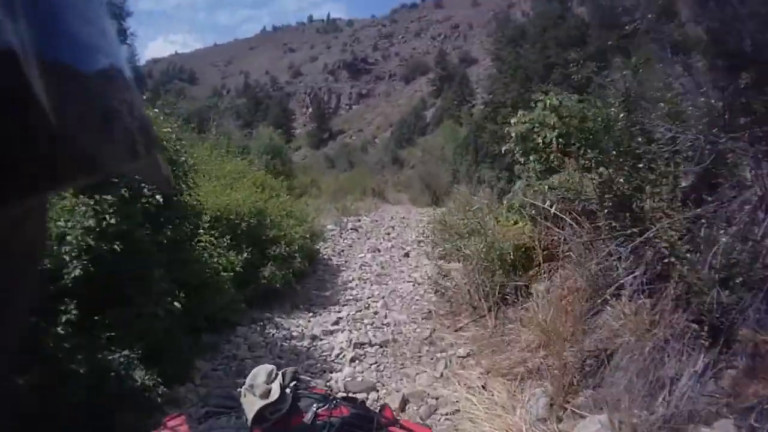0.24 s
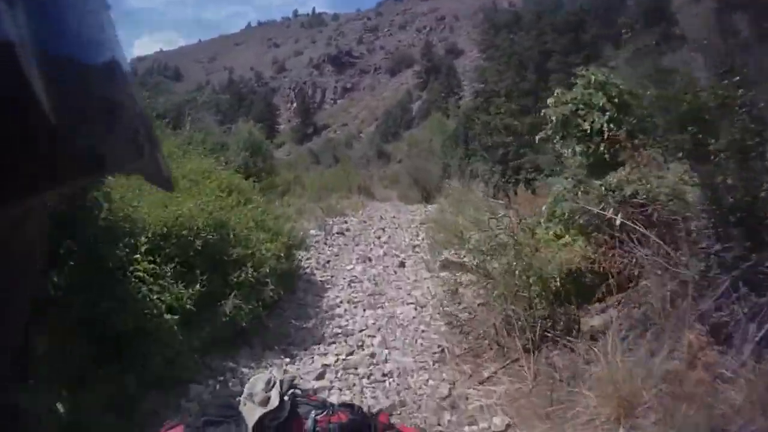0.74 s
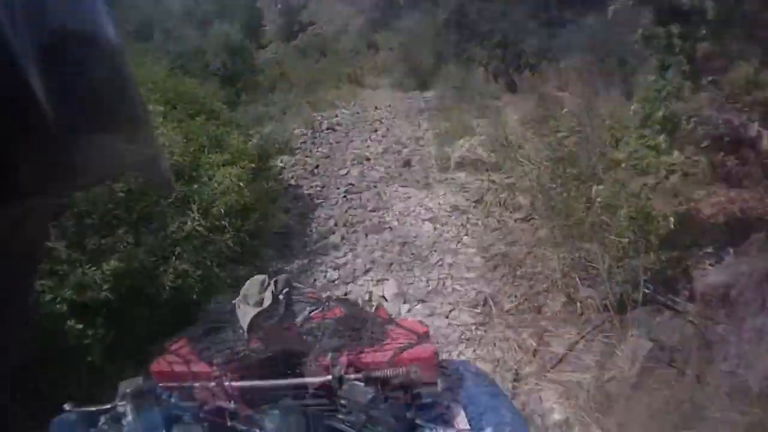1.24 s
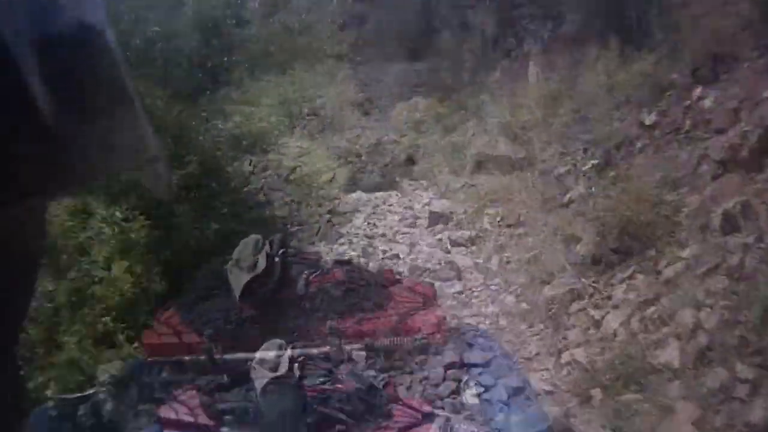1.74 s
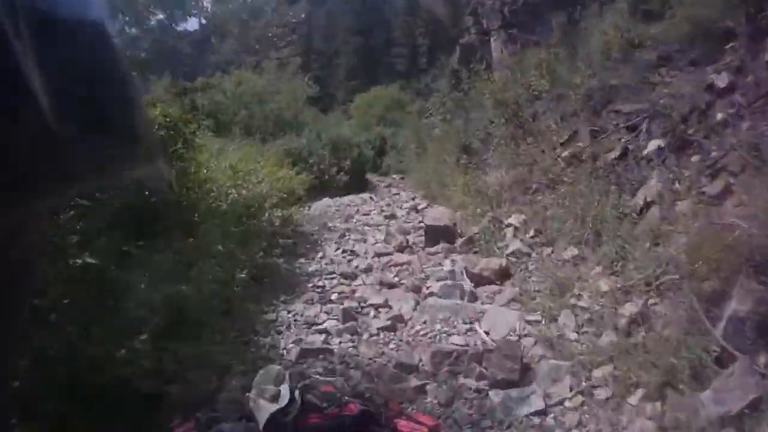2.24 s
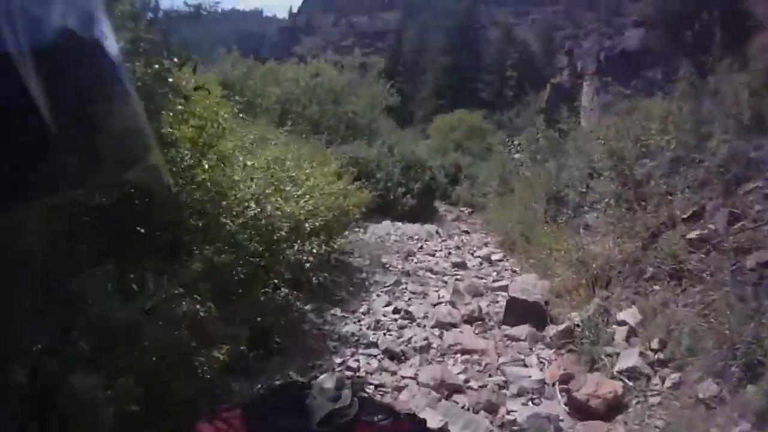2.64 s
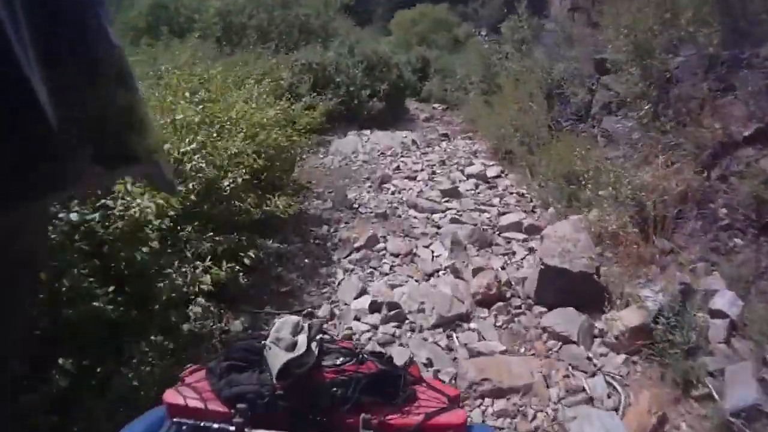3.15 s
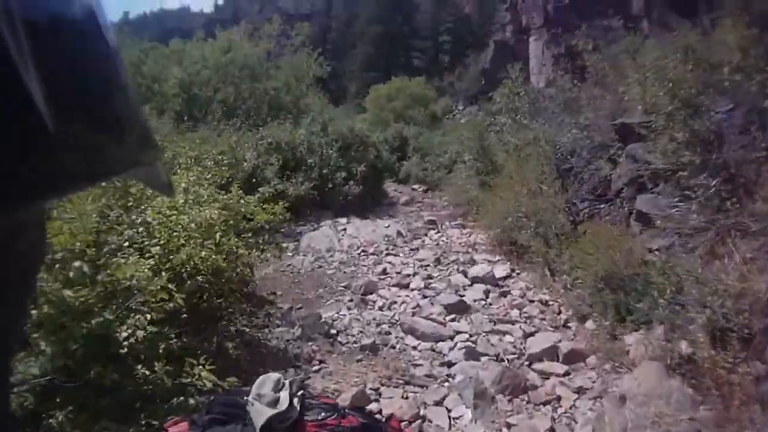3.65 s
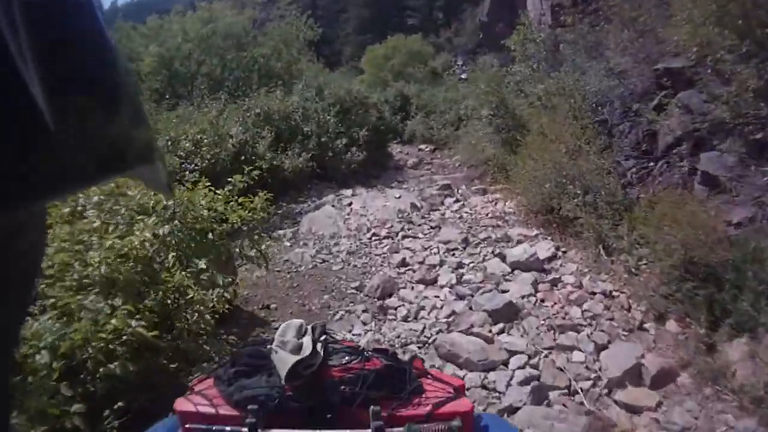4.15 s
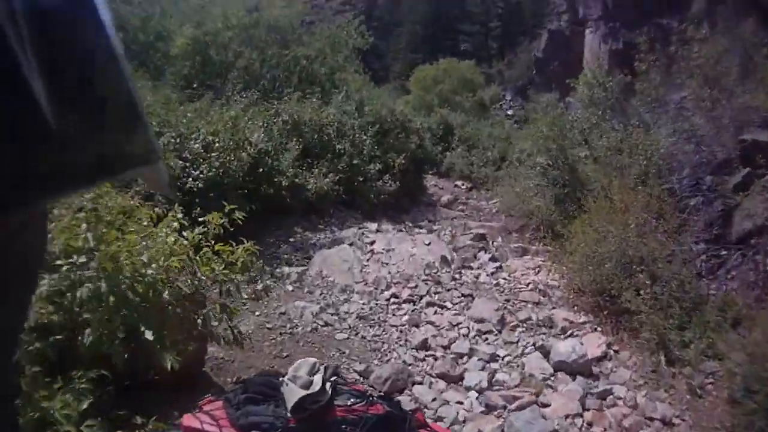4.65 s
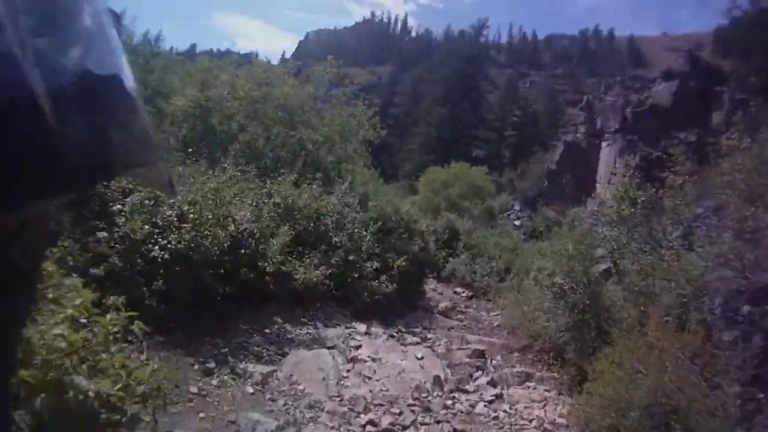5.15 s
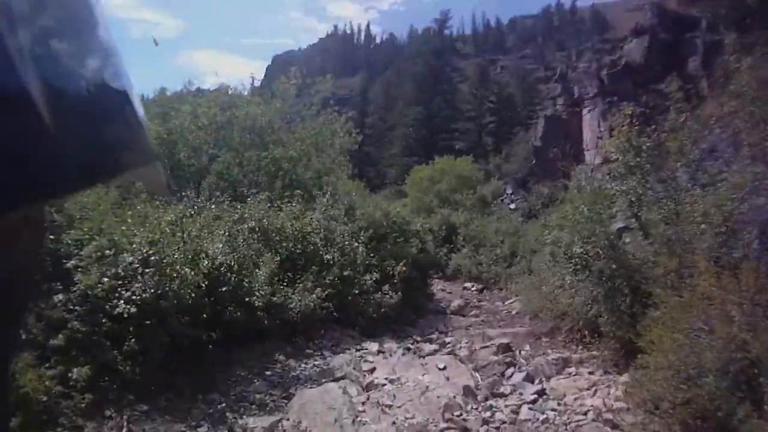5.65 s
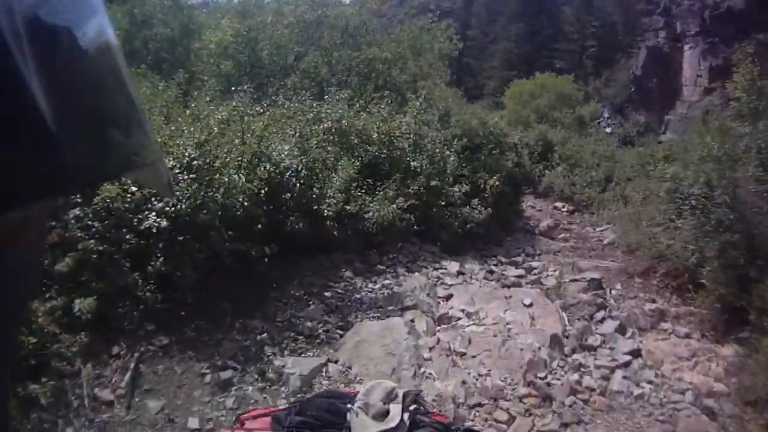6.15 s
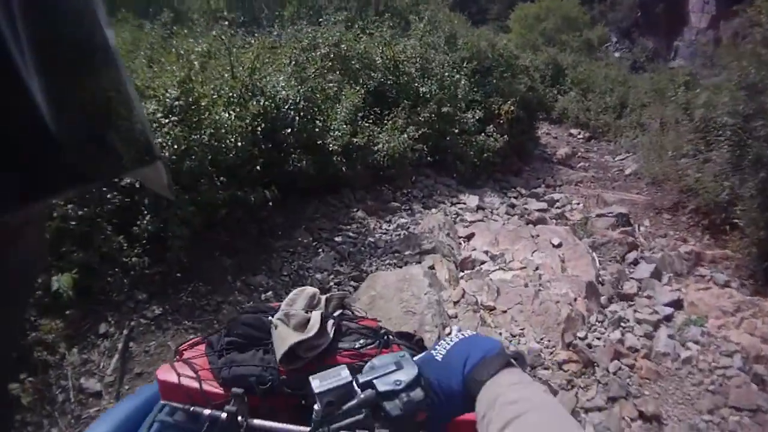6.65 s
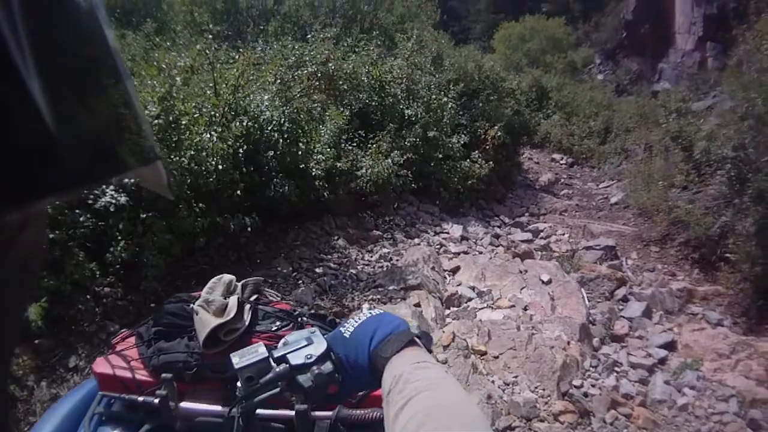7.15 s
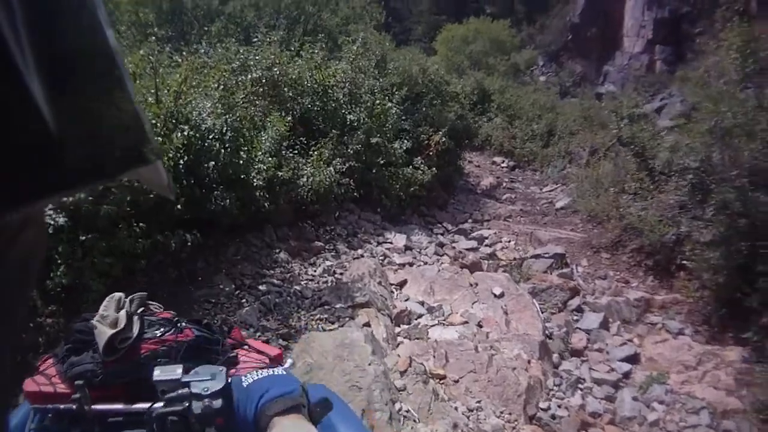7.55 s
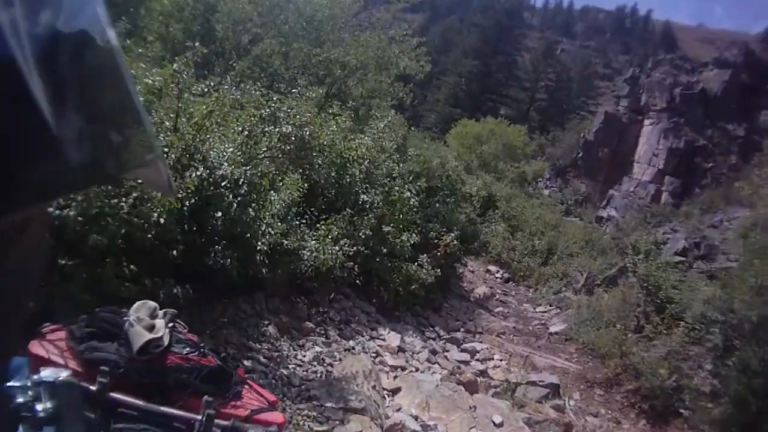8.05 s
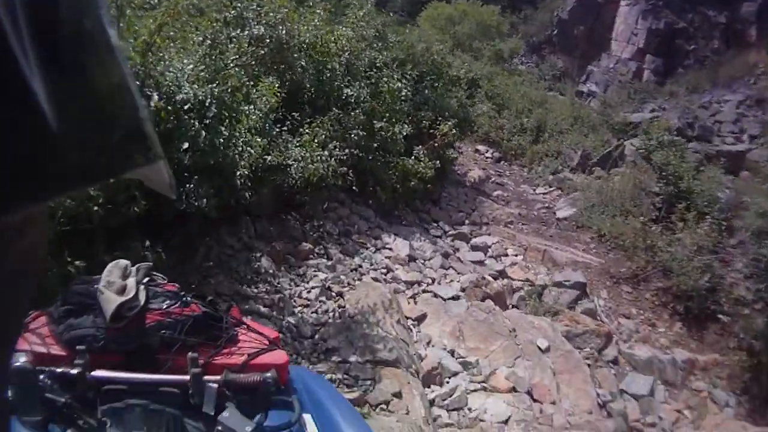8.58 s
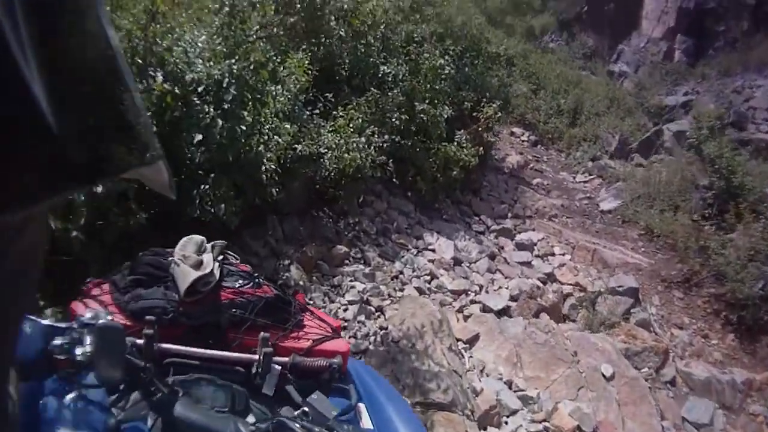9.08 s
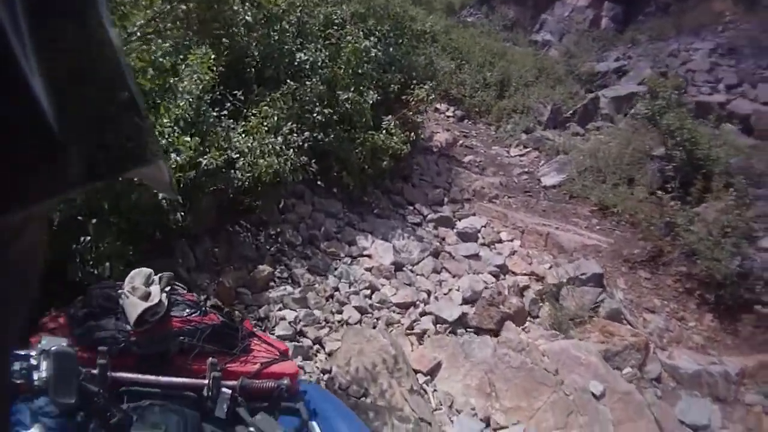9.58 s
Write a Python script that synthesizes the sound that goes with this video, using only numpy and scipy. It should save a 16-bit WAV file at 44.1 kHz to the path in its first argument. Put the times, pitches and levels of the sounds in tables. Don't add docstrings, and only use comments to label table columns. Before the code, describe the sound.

Low exhaust putter of an all-terrain vehicle crawling over loose stones, jolting with dull knocks and hard clicks, then swelling in one brief rev.

```python
import sys
import numpy as np
from scipy import signal
from scipy.fft import rfft, irfft, next_fast_len
from scipy.io import wavfile

SR = 44100
rng = np.random.default_rng(int(sys.argv[2]) if len(sys.argv) > 2 else 0)


def dump_mix(stems):
    frames = np.atleast_2d(stems).T
    limited = np.clip(frames, -1, 1)
    pcm = np.round(limited * 32767).astype(np.int16)
    wavfile.write(sys.argv[1], SR, pcm)


def decibels_to_gain(level_db):
    exponent = np.asarray(level_db, float) / 20
    return 10 ** exponent


N = 433062

# (frequency [Hz], density [dB per Hz])
SELF_NOISE = [(1000, -20), (4000, -5), (8000, -2), (11500, -0.5), (14800, 0), (15400, -3), (16000, -6)]
SELF_NOISE_DB = -74
STEADY_TOP_HZ = 15330
FLICKER_FROM_HZ, FLICKER_DB = 12800, 5

# (frequency [Hz], width [Hz], level [dB])
WHINES = [
    (1415, 40, -72),
    (11988, 10, -94),
]
# (frequency [Hz], density [dB per Hz])
HISS_SPECTRUM = [(2650, -41), (4500, -2.5), (4740, -2.5), (5250, -9), (6570, -1), (7900, -8.5),
                 (8800, -8.5), (10100, -16.5), (13300, -13.5), (15300, -23)]
# (frequency [Hz], density [dB per Hz])
GRAVEL_SPECTRUM = [(530, 8), (900, -9), (1030, -15), (1250, -5.5), (1440, -2.5), (1610, -2), (2530, 2.5),
                   (2770, 0.5), (2980, -5), (3200, -4), (4080, -5.5), (5200, -22), (6760, -23),
                   (11400, -120)]
# (frequency [Hz], density [dB per Hz])
RUMBLE_SPECTRUM = [(200, -28), (270, -3.5), (320, -6.5), (400, -0.5), (460, 1), (510, -4), (600, -5.5),
                   (780, -17), (980, -30.5), (1100, -27.5), (1430, -32), (2400, -110)]
# (frequency [Hz], density [dB per Hz])
LUMP_SPECTRUM = [(15, -38), (30, -22), (60, -1.5), (100, -1.5), (150, -8.5), (200, -0.5), (280, -5.5),
                 (340, -21), (450, -45), (900, -90)]
# (time [s], frame rumble level [dB])
ROUGHNESS = [(.578, -37.5), (.582, -31), (.77, -33.5), (1.0, -32.5), (1.67, -32.5), (2.58, -35),
             (2.59, -37.5), (2.79, -38), (3.76, -40.5), (4.36, -43), (4.82, -41.5), (5.51, -46.5),
             (6.44, -45), (7.18, -41.5), (7.64, -42.5), (8.24, -51.5), (8.45, -49), (9.82, -47.5)]
# (rumble [dB], gravel [dB], hiss [dB], tyre lumps [dB])
STIRRED = [(-51, -62, -75.5, -59), (-43, -57.5, -72.5, -58), (-37, -51, -68, -50.5),
           (-35, -50, -65.5, -47.5), (-32, -47, -61.5, -41)]
# (time [s], rise over the gravel [dB], swell [s])
SCUFFS = [(.22, 2.5, 0.012), (.80, 10, 0.017), (1.33, 4, 0.0052), (1.46, 5.5, 0.015), (1.64, 2, .012),
          (2.36, 3.5, 0.02), (3.63, 6, 0.015), (5.24, 2, 0.0069), (5.38, 6.5, .01), (6.17, 4.5, 0.063),
          (6.33, 5, 0.027), (6.56, 7, 0.031)]

# (time [s], peak level [dB], frequency [Hz])
KNOCKS = [(.23, -20.5, 415), (.601, -18, 458), (.656, -27, 347), (.816, -16, 377), (1.0, -24, 365),
          (1.08, -21, 337), (1.5, -15, 410), (2.361, -18, 427), (2.737, -24, 430), (3.248, -33, 310),
          (3.249, -14.5, 408), (3.357, -16, 624), (3.631, -21.5, 760), (3.921, -28, 440), (4.356, -25, 487),
          (4.716, -30, 396), (4.772, -26.5, 504), (5.412, -27, 636), (5.506, -27.5, 470), (5.899, -31, 303),
          (5.901, -32.5, 730), (5.911, -25, 317), (5.915, -31, 626), (5.919, -27, 430), (6.474, -30, 460),
          (6.569, -13, 450), (6.621, -26, 448), (7.021, -21.5, 456), (7.315, -29, 584), (9.689, -36, 466)]
# (peak level [dB], cycles to fall 60 dB [count])
KNOCK_CYCLES = [(-31.5, 26.5), (-14.5, 13)]
# (time [s], peak level [dB], frequency [Hz], share passed to the panels [dB])
TICKS = [(.2129, -40.5, 2750, -8), (.5811, -46, 1920, -4), (.7146, -32.5, 2770, -19),
         (.778, -34, 2600, -17), (0.813, -38, 2830, -23), (0.8523, -33, 2800, -21), (1.015, -34, 3220, -24),
         (1.294, -26, 2580, -18), (1.4571, -38, 3200, -19), (2.8554, -26.5, 2420, -14),
         (2.98, -41, 2670, -19), (3.0111, -39.5, 2410, -13), (3.0839, -39.5, 2660, -20),
         (3.1527, -45, 2760, -14), (3.218, -27.5, 2440, -15.5), (3.3515, -40.5, 2840, -6),
         (3.503, -36, 2440, -7.5), (3.6315, -28, 2930, -18), (3.7437, -30, 3100, -28),
         (3.8557, -40, 2700, -18), (3.922, -33, 2540, -10.5), (4.142, -40, 2430, -15),
         (4.5036, -46, 2240, -6), (5.393, -34, 3390, -18), (5.529, -29, 2560, -8.5),
         (5.7217, -47, 2520, -12), (5.905, -56, 2140, 1), (6.1888, -41, 2460, -9), (6.341, -42, 2200, -21),
         (8.4058, -39.5, 3070, -18)]
# (peak level [dB], t60 [s])
TICK_T60 = [(-46, .022), (-25, 0.014)]
# (frequency [Hz], level [dB], t60 [s])
PANEL_MODES = [(916, -4, 0.054), (1253, -3.5, 0.046), (1455, 0, 0.05), (1850, 2, 0.028)]
# (time [s], peak level [dB], brightness [dB per octave], gap between the two slips [ms])
SNAPS = [(1.3378, -22, -5, 0.97), (2.2706, -10.5, 6.5, 0.93), (2.5844, -44, 4, .95),
         (2.834, -19.5, 6.5, 0.93), (3.1969, -13.5, 4, 0.89), (3.4755, -12.5, 5, 0.86),
         (3.8887, -15, 2.5, 0.87), (4.9438, -11, -2.5, 0.95), (5.0843, -33.5, -10.5, 1),
         (5.1943, -30, -5, 0.75), (5.2, -17, 5.5, .95), (5.226, -28.5, -10, 0.97), (5.3527, -42, -5, .9),
         (5.3943, -39, -3, .9), (5.4198, -20, -5.5, 0.92), (5.529, -38, -0.3, 0.98),
         (6.4502, -7.5, 3, 0.91), (8.4053, -31.5, 0.5, 0.83)]
# (frequency [Hz], level [dB], t60 [s])
HOUSING_MODES = [(1556, -15.5, 0.037), (3050, -22.5, 0.026), (3605, 3, 0.008), (3910, 0.5, 0.0054),
                 (4780, -7, 0.011), (5480, -8.5, 0.0054), (6510, 1, 0.0044), (7750, -5, 0.0058),
                 (8370, -1.5, 0.0034), (10050, -6.5, 0.0049), (10900, -9, 0.0064), (12000, -8, 0.002),
                 (13400, -13, 0.0028), (15000, -22, .005)]

# (share of ring pitch [ratio], level [dB])
PIPE_MODES = [
    (.24, -19.5),
    (1.0, 2.5),
    (2.05, -16),
]
# (swell [ring cycles], sharpness [power], pipe-end return [ring cycles], return level [dB])
THUMP_SHAPE = [
    (1.46, 3.0, 2.27, -3.4),
    (2.1, 1.45, 2.43, -7.2),
]
IDLE_PER_S, REVVED_PER_S = 14, 21
# (thump peak [dB], ring [Hz], boom peak [dB], boom [Hz], boom swell [ms])
STEADY_THUMP = (-34, 255, -43.5, 121.5, 16.5)
STEADY_FIRST_S, STEADY_PER_S, STEADY_FIRINGS = 0.039, 23.55, 60
STEADY_FADE_DB_PER_S, STEADY_BOOM_FADE_DB_PER_S = -0.7, -0.1
# (time [s], firing rate [per s])
SPEED = [(.619, 29.41), (1.52, 28.4), (2.41, 21.94), (3.12, 18.87), (3.16, 17.01), (3.92, 15.91),
         (4.28, 14.31), (5.01, 14.09), (5.21, 13.2), (5.47, 13.87), (6.41, 12.97), (7.07, 20.67),
         (7.6, 21.05), (8.18, 17.31), (8.24, 14.52), (8.45, 13.51), (9.59, 13.28), (9.82, 14.04)]
# (time [s], thump peak [dB], coasting [0-1])
THROTTLE = [(.58, -33.5, .2), (1.0, -30.5, 0), (1.5, -33, .8), (1.85, -32.5, 1), (2.2, -30, 0.95),
            (3.05, -34.5, 0.8), (3.8, -37.5, .8), (3.9, -34.5, 0.2), (4.2, -33.5, 0.14), (5.8, -34, 0.18),
            (6.7, -32.5, 0), (7.0, -27.5, 0), (7.5, -29, 0.12), (8.19, -32, 0.03), (8.22, -41, 0.9),
            (8.31, -43, 0.9), (8.36, -33.5, .4), (9.0, -34, 0.07), (9.82, -33, 0.37)]
# (firing rate [per s], pipe ring [Hz], boom peak [dB], boom [Hz], boom swell [ms])
PULLING = [(13.46, 228.6, -41.5, 94, 11.3), (19.97, 253.2, -43, 113, 19.5), (25.5, 266, -37, 120, 18.6),
           (27, 282, -55, 126, 11)]
# (pipe ring [Hz], boom peak [dB], boom [Hz], boom swell [ms])
COASTING = (-29.5, -1, -21.5, -3)


def rms_one(x):
    return x / np.sqrt(np.mean(x ** 2) + 1e-20)


def by_law(x, rows):
    key, *columns = np.transpose(rows)
    return [np.interp(x, key, column) for column in columns]


def in_time(rows):
    return by_law(np.arange(N) / SR, rows)


def add(out, starts, grains):
    at = np.round(starts * SR).astype(int)[:, None] + np.arange(grains.shape[1])
    inside = (at >= 0) & (at < N)
    np.add.at(out, at[inside], grains[inside])


def swell(t, peak_s, order):
    u = np.maximum(t, 0) / peak_s
    return (u * np.exp(1 - u)) ** order


def drift(rate):
    step = 40
    r = np.exp(-2 * np.pi * rate * step / SR)
    noise = rng.standard_normal(N // step + 2002)
    slow = signal.lfilter([1], [1, -2 * r, r * r], noise)[2000:]
    return np.interp(np.arange(N) / step, np.arange(len(slow)), rms_one(slow))


def coloured(x, spectrum):
    hz, level_db = np.transpose(spectrum)
    size = next_fast_len(N)
    log_hz = np.log(np.arange(size // 2 + 1) * SR / size + 1)
    gain = decibels_to_gain(np.interp(log_hz, np.log(hz), level_db))
    return rms_one(irfft(rfft(x, size) * gain, size)[:N])


def grit(per_s, spread_db, share):
    sizes = decibels_to_gain(spread_db * np.minimum(rng.exponential(1, N), 5)) * rng.choice([-1, 1], N)
    grains = rms_one(sizes * (rng.random(N) < per_s / SR))
    return np.sqrt(1 - share) * rng.standard_normal(N) + np.sqrt(share) * grains


def shake(fired, lead_s, peak_s):
    out = np.zeros(N)
    shape = swell(np.arange(3000) / SR, peak_s, order=2)
    add(out, fired - lead_s, decibels_to_gain(2.5 * rng.standard_normal((len(fired), 1))) * shape)
    return out


def self_noise():
    return coloured(rng.standard_normal(N), SELF_NOISE) * decibels_to_gain(SELF_NOISE_DB + 2.2 * drift(15))


def whine():
    out = 0
    for hz, width_hz, level_db in WHINES:
        r = np.exp(-np.pi * width_hz / SR)
        poles = [1, -2 * r * np.cos(2 * np.pi * hz / SR), r * r]
        ring = signal.lfilter([1, 0, -1], poles, rng.standard_normal(N))
        out = out + decibels_to_gain(level_db) * rms_one(ring)
    return out


def scuffs():
    s, rise_db, swell_s = np.array(SCUFFS).T[:, :, None]
    out = np.ones(N)
    add(out, s[:, 0], (decibels_to_gain(rise_db) - 1) * swell(np.arange(6000) / SR, swell_s, order=2))
    return out


def hiss(hiss_db, crunch):
    grains = grit(400, 4.0, 0.08)
    return coloured(grains, HISS_SPECTRUM) * decibels_to_gain(hiss_db + 1.5 + 2.04 * crunch) * scuffs()


def gravel(gravel_db, crunch, fired):
    stones_rub = coloured(grit(400, 4.5, 0.12), GRAVEL_SPECTRUM) * decibels_to_gain(gravel_db + 1.2 * crunch) * scuffs()
    ringing = whine() * decibels_to_gain(gravel_db + 59)
    return (stones_rub + ringing) * (1.177 + 0.3 * shake(fired, 0.006, 0.015))


def tyre_lumps(lumps_db):
    return coloured(rng.standard_normal(N), LUMP_SPECTRUM) * decibels_to_gain(lumps_db + 2.5 * drift(12))


def rumble(rumble_db, fired):
    quiet = decibels_to_gain(-0.5 * (rumble_db + 47))
    ride = coloured(grit(300, 2.54, 0.23), RUMBLE_SPECTRUM) * decibels_to_gain(rumble_db + 0.92 * drift(33))
    return ride * (0.72 + 0.72 * quiet * shake(fired, 0.008, 0.014))


def struck(s, level_db, hz, t60, rise_s, spread):
    t, out = np.arange(2500) / SR, np.zeros(N)
    luck = rng.standard_normal((len(s), 6))
    tone = np.sin(2 * np.pi * hz * t)
    for k in range(3):
        share = 0.45 * np.tanh(2 * luck[:, k, None])
        mode_hz = hz * np.exp(spread * np.tanh(luck[:, 3 + k, None]))
        tone = tone + share * np.sin(2 * np.pi * mode_hz * t)
    decay = decibels_to_gain(level_db - 60 * t / np.clip(t60, 0.004, 0.1))
    add(out, s[:, 0], decay * (1 - np.exp(-t / rise_s)) * tone)
    return out


def knocks():
    s, level_db, hz = np.array(KNOCKS).T[:, :, None]
    cycles, = by_law(level_db, KNOCK_CYCLES)
    return struck(s, level_db, hz, cycles / hz, rise_s=0.0023, spread=0.13)


def stone_ticks():
    s, level_db, hz, body_db = np.array(TICKS).T[:, :, None]
    t60, = by_law(level_db, TICK_T60)
    out = struck(s, level_db, hz, t60, rise_s=0.00029, spread=0.17)
    for panel_hz, panel_db, panel_t60 in PANEL_MODES:
        panel_level_db = level_db + body_db + panel_db
        out = out + struck(s, panel_level_db, panel_hz, panel_t60, rise_s=0.00084, spread=0.11)
    return out


def mount_snaps():
    s, level_db, bright_db, gap_ms = np.array(SNAPS).T[:, :, None]
    t, out = np.arange(1500) / SR, np.zeros(N)
    luck, grains = rng.standard_normal((len(s), len(HOUSING_MODES))), 0
    for k, (hz, mode_db, t60) in enumerate(HOUSING_MODES):
        tilt_db = bright_db * np.log2(hz / 5000)
        for lag, lag_db in (0, 1), (gap_ms / 1000, -4.9):
            decay = (t >= lag) * decibels_to_gain(-60 * np.maximum(t - lag, 0) / t60)
            ring = decay * np.sin(2 * np.pi * hz * (t - lag))
            ring_db = mode_db + lag_db + tilt_db + 1.3 * luck[:, k, None]
            grains = grains + (-1) ** k * decibels_to_gain(ring_db) * ring
    add(out, s[:, 0] + 0.0007, decibels_to_gain(level_db - 12) * grains)
    return signal.sosfilt(signal.butter(4, 1300, "high", fs=SR, output="sos"), out)


def thumps(troughs, tone, uneven_db):
    level_db, hz, boom_db, boom_hz, boom_ms = np.array(tone)[:, :, None]
    luck = uneven_db * rng.standard_normal((len(troughs), 4))
    per_s = 1 / np.gradient(troughs)[:, None]
    shape = [np.interp(per_s, [IDLE_PER_S, REVVED_PER_S], column) for column in np.transpose(THUMP_SHAPE)]
    cycles, sharp, back, back_db = shape
    boom_order = 6 * (11 / boom_ms) ** 2
    lead, step = 900, 4
    t, grains = np.arange(-lead, 3500, step)[None] / SR, 0
    for lag, lag_db, boom_lag_db in (0, 0, 0), (back / hz, back_db, 1.6 * back_db + 7.7):
        since = t - lag + 1.67 / boom_hz
        puff = swell(since, boom_ms / 1000, boom_order) * np.sin(2 * np.pi * boom_hz * since)
        grains = grains + decibels_to_gain(boom_db + boom_lag_db + luck[:, :1]) * puff
        since = t - lag + 9 / 4 / hz
        for k, (share, mode_db) in enumerate(PIPE_MODES):
            puff = -swell(since, cycles / hz, sharp) * np.sin(2 * np.pi * share * hz * since)
            grains = grains + decibels_to_gain(level_db + mode_db + lag_db + luck[:, k + 1, None]) * puff
    out = np.zeros(N)
    add(out, troughs - lead / SR, signal.resample_poly(grains, step, 1, axis=1))
    return out


def steady_thumps():
    fired = STEADY_FIRST_S + np.arange(STEADY_FIRINGS) / STEADY_PER_S
    level_db, hz, boom_db, boom_hz, boom_ms = np.multiply.outer(STEADY_THUMP, np.ones_like(fired))
    level_db = level_db - STEADY_FADE_DB_PER_S * fired
    boom_db = boom_db - STEADY_BOOM_FADE_DB_PER_S * fired
    return thumps(fired, [level_db, hz, boom_db, boom_hz, boom_ms], uneven_db=1.3)


def firing_times():
    t = np.arange(SPEED[0][0], N / SR, 0.001)
    turns = np.cumsum(by_law(t, SPEED)[0]) * 0.001
    return np.interp(np.arange(int(turns[-1]) + 1), turns - turns[0], t)


def quad_engine(fired):
    level_db, coasting = by_law(fired, THROTTLE)
    pulling = by_law(by_law(fired, SPEED)[0], PULLING)
    tone = [value + coasting * change for value, change in zip(pulling, COASTING)]
    return thumps(fired, [level_db] + tone, uneven_db=0.9)


def scene():
    fired = firing_times()
    rumble_db, = in_time(ROUGHNESS)
    gravel_db, hiss_db, lumps_db = by_law(rumble_db, STIRRED)
    crunch = drift(38)
    steady = self_noise() + hiss(hiss_db, crunch) + gravel(gravel_db, crunch, fired)
    steady = signal.sosfilt(signal.ellip(10, 0.5, 60, STEADY_TOP_HZ, fs=SR, output="sos"), steady)
    ride = steady + tyre_lumps(lumps_db) + rumble(rumble_db, fired)
    jolts = knocks() + stone_ticks() + mount_snaps()
    return (ride + jolts + steady_thumps() + quad_engine(fired))[None]


def band_limit(x):
    return signal.sosfilt(signal.butter(12, 16510, fs=SR, output="sos"), x)


def record(dry):
    top = signal.sosfiltfilt(signal.butter(4, FLICKER_FROM_HZ, "high", fs=SR, output="sos"), dry)
    flicker_db = np.minimum(FLICKER_DB * (drift(14) + 0.6), 1.5)
    flickering = dry + top * (decibels_to_gain(flicker_db) - 1)
    mix = signal.sosfilt(signal.butter(1, 25, "high", fs=SR, output="sos"), flickering)
    return band_limit(mix)


dry = scene()
out = record(dry)
dump_mix(out)
```